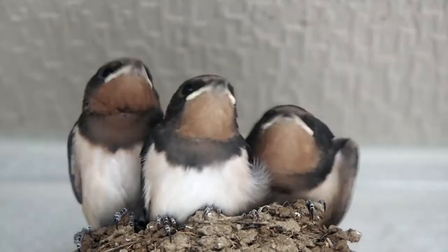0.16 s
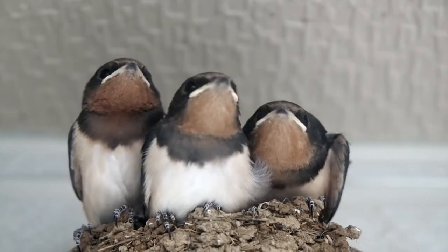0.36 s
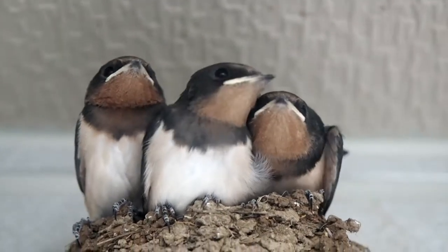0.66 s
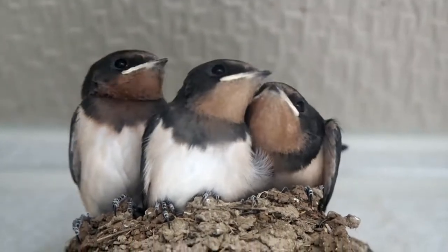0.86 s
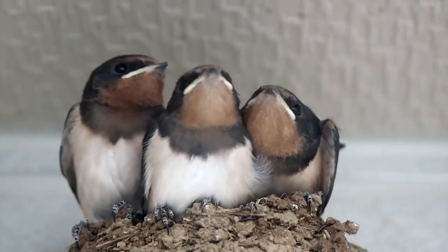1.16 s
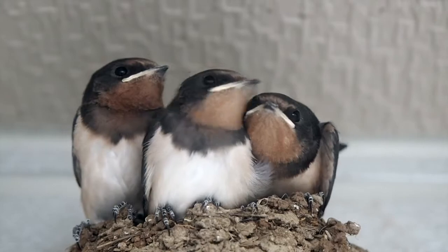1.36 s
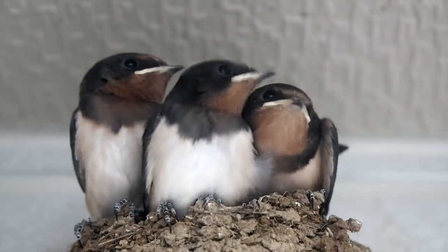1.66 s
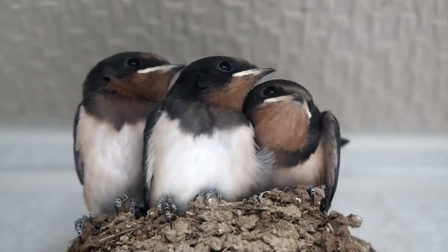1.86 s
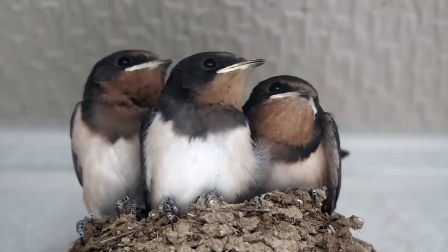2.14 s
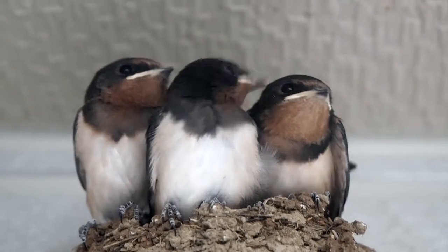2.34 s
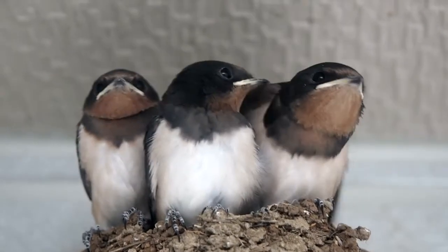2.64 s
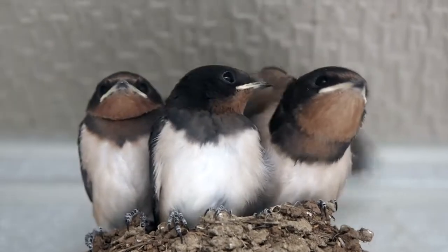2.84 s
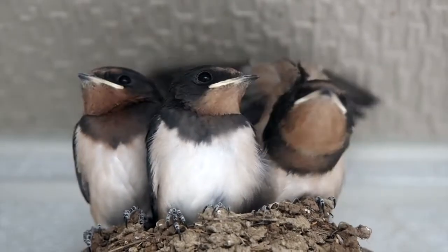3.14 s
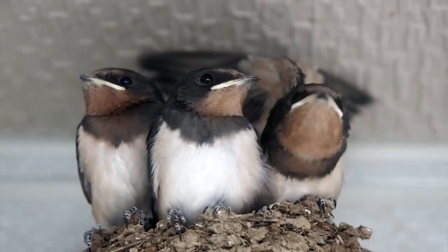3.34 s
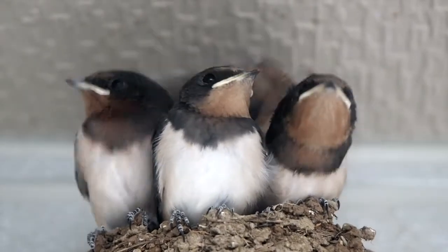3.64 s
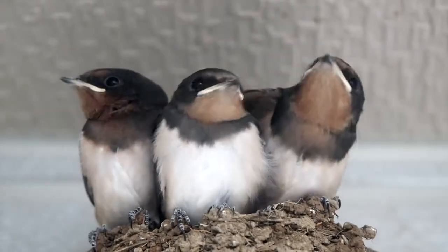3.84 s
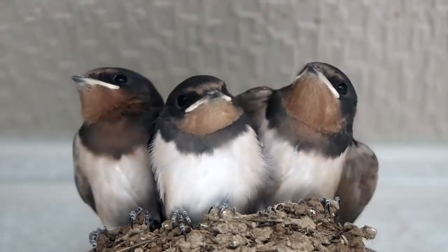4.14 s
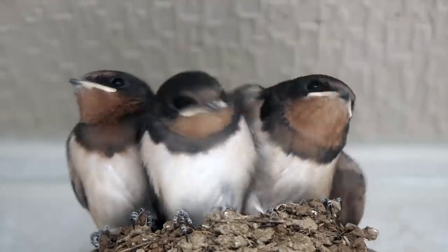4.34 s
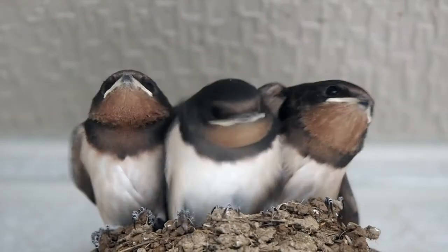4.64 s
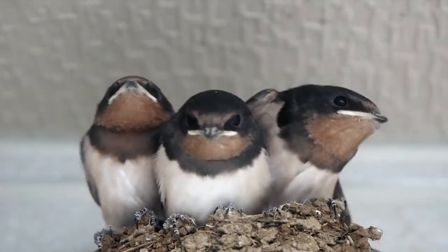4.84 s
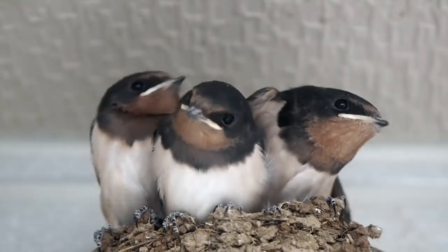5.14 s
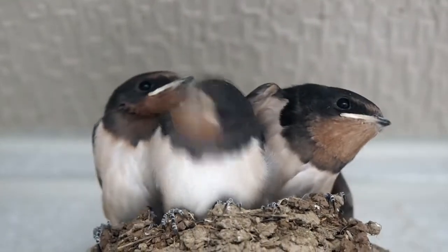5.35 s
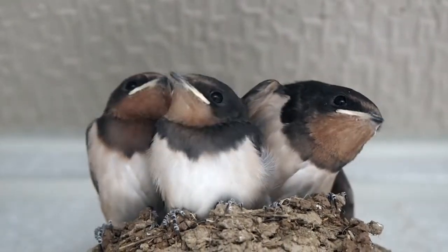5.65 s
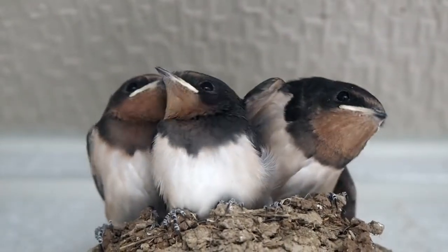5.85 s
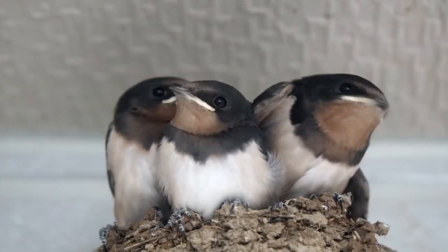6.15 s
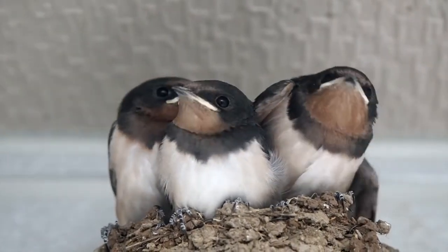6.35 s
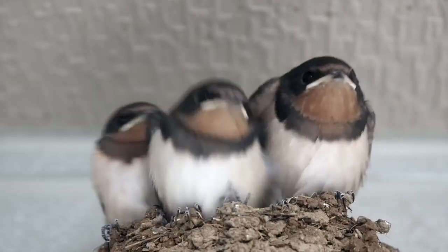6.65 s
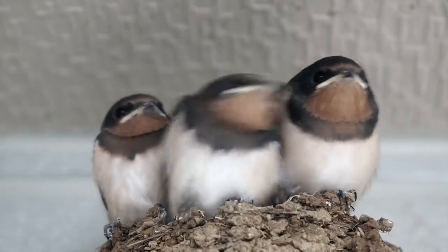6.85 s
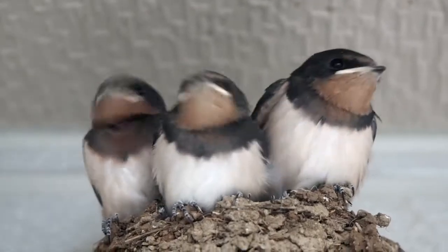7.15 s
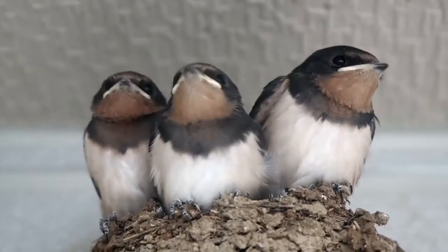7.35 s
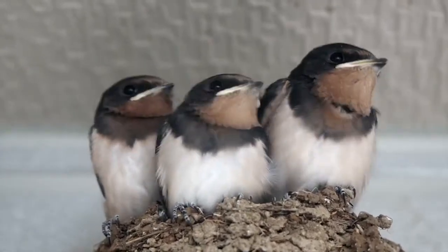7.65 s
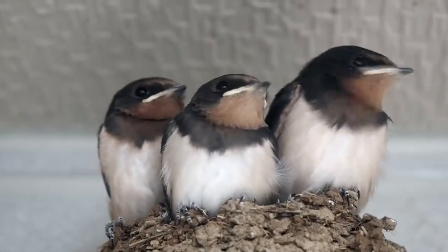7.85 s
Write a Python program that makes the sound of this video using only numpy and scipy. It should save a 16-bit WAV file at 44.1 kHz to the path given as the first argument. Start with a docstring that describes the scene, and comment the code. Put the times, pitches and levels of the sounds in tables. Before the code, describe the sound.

Close, near-centred calls of three swallow chicks under eaves, in stereo with tight echoes and a short tail. Each is about 0.1 s: grainy rasp first, then two simultaneous whistles sweeping up to roughly 3.5 and 5 kHz. Chirps at 0 and 0.15 s, a faint scuff at 0.6, two overlapping at 0.95, a very soft rustle near 1.4, then calls at 1.55, an overlapping pair at 2.07, and 2.9. A close pair comes at 3.35-3.4, then 4.05, 4.4, a strained one at 5.0, 5.5 and 5.95. After a pause with a tiny scuff at 6.9, two follow at 7.15-7.2 and a loud, clearer one at 7.55. Underneath, quiet steady air and distant traffic swell around 5 and 7.2 s; a deep engine drone rises near 4, lingers past 5 and winds down towards 6.8. A machine hums and whines faintly.

```python
"""Three swallow chicks beg from a mud nest under the eaves, each with a call of its own. A call starts as a
rasp of noise and clears into two rising whistles, one from each side of the syrinx. Wall and ceiling close by
echo it, and brief soft hisses come from the nest: two faint rasps and a feather rustle. Behind are steady air
noise, distant traffic as swelling noise, a humming and whining machine as wandering sines, and a deep engine
drone that winds down. A stereo microphone takes it all in."""
import sys
import numpy as np
from scipy import signal
from scipy.fft import rfft, irfft
from scipy.io import wavfile
from scipy.ndimage import uniform_filter1d

SR = 44100
rng = np.random.default_rng(int(sys.argv[2]) if len(sys.argv) > 2 else 0)


def persist_wave(psi):
    """Save psi, clipped to +-1, as 16-bit WAV."""
    counts = np.round(np.clip(psi, -1, 1) * 32767).astype(np.int16)
    wavfile.write(sys.argv[1], SR, np.atleast_2d(counts).T)


N = 352800
TIME = np.arange(N) / SR  # s

# Levels of the birds and scuffs are relative; scene() sets the balance of the nest against the street.
# Calls of each chick: (start [s], length [s], pitch [ratio], level [dB], hoarseness [ratio], strain [dB])
LONG_TIMES = [(-.014, 0.12, 1.03, 0.5, 1.1, -0.5), (1.537, .12, 1, 1.4, 1.05, -3),
              (3.403, .12, 1.04, -4, 1.4, -7.5), (4.369, .129, 1.056, -0.4, 1.02, 0),
              (5.964, .115, .99, 1.5, 1, -.5), (7.559, 0.13, 1, 4, .68, -1)]
HOARSE_TIMES = [(.153, .094, 0.97, 1.6, 0.88, -1), (.939, 0.092, 0.96, 1.5, 0.83, -0.87),
                (2.07, 0.095, 0.98, 1.4, 0.86, 0.073), (2.9, .095, 0.99, -.7, 1.21, 0.51),
                (4.036, .098, .97, -0.79, 1.14, 1.4), (5.52, .097, .98, 0.81, 1, -0.65),
                (7.131, 0.1, 0.97, 0.039, 1.08, 0.85)]
SHARP_TIMES = [(.939, 0.094, 0.96, 0.45, 1.13, -1), (2.072, 0.093, 1.01, 0.65, 1.08, -4),
               (3.356, 0.097, 1.046, 0.61, 0.73, -3.5), (5.022, 0.095, 0.98, 0.054, 1.15, 8),
               (7.204, 0.09, 1.005, 2.6, 0.8, 5)]

# Every call is one gesture: the pitch sags, then climbs to a top note, while the sound swells and clears.
# Places within a call are shares of its length [0-1]; the pitch ratio of each call scales the glides.
# low_glide, high_glide of the two voices: (opening [Hz], lowest [Hz], top [Hz], place of the lowest [share],
#     place of the top [share], power of the climb)
# low_swell, high_swell, rasp_swell: (peak [dB], place of the peak [share, held to .99 at most],
#     power of the attack, fade by the end [dB])
# clearing: (roughness at first [0-1], roughness at last [0-1], place of the change [share], width [share])
LONG_CALL = dict(low_glide=(2480, 2130, 3620, 0.326, .87, 4.6),
             high_glide=(3600, 2930, 4650, .33, .87, 2.4), low_swell=(-20.8, .83, 8, 4),
             high_swell=(-21.5, .79, 1.05, 10), rasp_swell=(-28.2, 1.5, .3, 7),
             clearing=(.7, .08, .6, 0.14))
HOARSE_CALL = dict(low_glide=(2870, 2800, 3490, 0.202, .83, 1.9),
               high_glide=(5000, 4220, 5380, .41, .85, 1.9), low_swell=(-21, 2.3, 1.3, 4),
               high_swell=(-21, 0.8, 0.66, 16), rasp_swell=(-26, .78, 0.58, 12),
               clearing=(.9, 0.24, .45, 0.13))
SHARP_CALL = dict(low_glide=(2700, 2380, 3760, .58, 0.88, 1.9),
              high_glide=(4100, 3450, 5150, 0.57, .88, 1.7), low_swell=(-10, 0.9, 6, 10.5),
              high_swell=(-20, 0.87, 1.4, 14.5), rasp_swell=(-23, 0.7, 0.7, 18),
              clearing=(0.96, 0.1, 0.645, .04))

# Colour of each chick's rasp: (frequency [Hz], level [dB])
LONG_RASP = [(1000, -18), (1800, -18), (2400, 1.5), (3300, -2), (4300, -1), (5000, -14.5), (5750, -4.5),
             (6700, -13.5), (7800, -11.5), (9100, -8), (10800, -12.5), (12600, -18.5), (13400, -44)]
HOARSE_RASP = [(1000, -30.5), (1750, 2.5), (2150, -6), (2850, 3.5), (3600, -1), (4500, 2.5), (5800, -3.5),
               (6700, -36), (7600, -40), (8700, -7.5), (10300, -18), (12500, -13.5), (13600, -33)]
SHARP_RASP = [(1000, -25), (1700, -11), (2350, 0.5), (3600, 2.5), (4700, -5.5), (5500, 6), (7000, -17),
              (8700, -11.5), (10000, -20.5), (12500, -19), (13600, -38)]

# Close echoes off wall and ceiling from each chick's place; a delay of 1 ms is 34 cm of extra path:
# (left delay [ms], left level [dB], right delay [ms], right level [dB])
LONG_ECHOES = [(0.906, -10.5, 0.32, -5.5), (1.051, -10.5, 0.503, -10), (1.435, -9, 0.93, -9)]
HOARSE_ECHOES = [(0.146, -8.5, 0.39, -13.5), (0.279, -11, 0.9, -33), (1.385, -9.5, 1.18, -26)]
SHARP_ECHOES = [(0.116, -5.5, 0.093, -11), (0.592, -9, 0.48, -9), (1.886, -15, 0.95, -19)]

# Brief soft hisses from the nest, two faint rasps and a feather rustle: (time [s], half length [s], relative
# level [dB], tilt [dB per octave])
NEST_HISSES = [(.595, .022, -44, -1), (1.42, .06, -63, 13), (6.917, .018, -43, 0)]
# Colour of these hisses before their tilt: (frequency [Hz], level [dB])
NEST_HISS_COLOUR = [(2200, -8), (3600, 3.5), (4800, -5), (6200, -19), (8800, -6.5), (12000, -21)]

# Colour of tyre noise and of rumble from the distant cars: (frequency [Hz], level [dB])
TRAFFIC_COLOUR = [(100, -12.5), (200, -5), (280, -6), (400, 1.5), (540, -12), (700, 0.5), (1080, -0.5),
                  (1300, -9), (1650, -2.5), (2500, -11), (3500, -15.5), (5000, -25.5), (9000, -26)]
RUMBLE_COLOUR = [(60, -3), (85, 0.5), (125, -3), (190, -12)]
# Swells of the tyre noise and of the rumble: (time [s], half length [s], level [dB])
TYRE_SWELLS = [(0, 0.56, -44), (4.9, 1.34, -43.5), (7.25, 0.91, -40)]
RUMBLE_SWELLS = [(.3, 0.42, -45), (6.5, 0.33, -47.5)]

# Swells of the deep engine drone: (time [s], half length [s], level [dB])
DRONE_SWELLS = [(3.1, .7, -40), (4.1, .32, -33.5), (5.4, 0.94, -35)]

# Steady lines of the machine: (frequency [Hz], level [dB], wander [Hz])
HUM_LINES = [(83.4, -52.5, 3.85), (2100, -61.5, 8)]
# Swells of the machine's whine and of its hum: (time [s], half length [s], level [dB])
WHINE_SWELLS = [(3.15, 0.22, -45.5), (5.75, 0.15, -42), (5.8, 1.9, -51)]
HUM_SWELLS = [(4.56, 1, -51)]

# Colour of the steady air, low and high part: (frequency [Hz], level [dB])
AIR_LOW = [(15, -37), (25, -1), (43, -5), (91, -9.5), (135, -4), (173, -14), (207, -6.5), (237, -15.5),
           (352, -13.5), (409, -10), (482, -23), (639, -13), (919, -17), (1010, -12.5), (1300, -27.5),
           (1690, -72), (2860, -120)]
AIR_HIGH = [(760, -27), (1300, -8), (1830, -0.5), (2010, -7), (2280, -1), (2890, -4.5), (3140, -4),
            (4650, -13.5), (5380, -12), (6900, -16), (8410, -10.5), (11000, -21), (15500, -31.5)]


def chick(shape, colour, calls, echoes, pan_db, **overtones):
    """One bird repeats its call; close echoes, as delayed copies, colour it differently at each ear."""
    out = np.zeros(N)
    for start, *manner in calls:
        call = chirp(shape, colour, *manner, **overtones)
        at = int(start * SR) + np.arange(len(call))
        inside = (at >= 0) & (at < N)
        out[at[inside]] += call[inside]
    khz = np.fft.rfftfreq(N, 1000 / SR)

    def echo(delay_ms, level_db):
        return undb(level_db) * np.exp(-2j * np.pi * khz * delay_ms)

    paths = 1  # the direct sound
    for left_ms, left_db, right_ms, right_db in echoes:
        paths = paths + np.array([echo(left_ms, left_db), echo(right_ms, right_db)])
    pan = undb(np.array([[pan_db], [-pan_db]]) / 2)  # positive is louder at the left
    return irfft(rfft(out) * paths, N) * pan


def chirp(shape, colour, length, pitch, level_db, hoarse, strain_db, coupling_db, sum_db, octave_db,
          low_octave_db, beak_hz):
    """Two voices and a rasp: the voices' beat adds sidebands to the high one, and they share a sum tone.
    Hoarseness roughens the voices and raises the rasp; strain couples the voices and brightens the rasp."""
    edge_s = .002
    t = np.arange(int((length + edge_s) * SR)) / SR
    place = t / length
    rough = clearing(place, *shape["clearing"])
    low_hz = glide(t, length, *shape["low_glide"])
    high_hz = glide(t, length, *shape["high_glide"])
    low, low_gain = membrane(pitch * low_hz, hoarse * rough)
    high, high_gain = membrane(pitch * high_hz, hoarse * rough)
    low_gain = low_gain * envelope(place, *shape["low_swell"])
    high_gain = high_gain * envelope(place, *shape["high_swell"])

    # the beat between the voices puts sidebands above the high one, weaker as the call clears
    coupling_growth = 1.1  # dB of extra coupling for each dB that a call is louder
    second_sideband = 0.28
    coupling = undb(coupling_db + strain_db + coupling_growth * level_db) * np.sqrt(abs(rough))
    beat = high * low.conj()
    sidebands = coupling * (beat + second_sideband * beat ** 2)
    voice = low_gain * low + high_gain * high * (1 + sidebands)

    # the low voice has an octave until it climbs too high
    low_octave_hz = 3200
    low_octave_gain = undb(low_octave_db) / (1 + (low_hz / low_octave_hz) ** 8)
    voice += low_octave_gain * low_gain * low ** 2

    # overtones flash out as they sweep into the resonance of the open beak
    beak_width_hz = 700

    def beak(hz):
        return 1 / (1 + .5 * ((pitch * hz - beak_hz) / beak_width_hz) ** 2)

    sum_gain = undb(sum_db) * np.sqrt(abs(low_gain * high_gain))
    voice += sum_gain * beak(low_hz + high_hz) * low * high
    voice += undb(octave_db) * high_gain * beak(2 * high_hz) * high ** 2

    rasp = hoarse * envelope(place, *shape["rasp_swell"]) * rasp_noise(colour, place, strain_db)
    edges = np.clip(np.minimum(t, t[-1] - t) / edge_s, 0, 1)
    return undb(level_db) * (voice.real + rasp) * edges


def membrane(hz, rough):
    """One side of the syrinx, fluttering in pitch and strength when it is rough: its cycle and its strength."""
    jitter, jitter_hz = 0.078, 450  # share of the pitch at roughness 1, rate
    shimmer, shimmer_hz = 0.45, 380  # share of the strength at roughness 1, rate
    size = len(hz)
    fluttering_hz = hz * (1 + jitter * rough * wander(jitter_hz, size))
    phase = 2 * np.pi * np.cumsum(fluttering_hz) / SR
    strength = np.sqrt(2) * (1 + shimmer * rough * wander(shimmer_hz, size))
    return np.exp(1j * phase), strength


def rasp_noise(colour, place, strain_db):
    """Grainy coloured noise, brighter under strain, whose treble grows as the beak opens."""
    strain_tilt = 0.48  # dB per octave for each dB of strain
    treble_hz, opening_db = 7000, 7
    grain, grain_hz = 0.26, 510  # depth, rate
    tilted = [(hz, db + strain_tilt * strain_db * np.log2(hz)) for hz, db in colour]
    hiss = coloured(tilted, len(place))
    treble = signal.sosfiltfilt(signal.butter(3, treble_hz, "high", fs=SR, output="sos"), hiss)
    treble_gain = undb(opening_db * (place ** 2 - 1))
    hiss = hiss + treble * (treble_gain - 1)
    return hiss * (1 + grain * wander(grain_hz, len(place)))


def glide(t, length, opening_hz, lowest_hz, top_hz, lowest_at, top_at, power):
    """Pitch of a voice: it sags to its lowest, climbs ever faster and holds the top note."""
    rounding_s = 0.0087  # the syrinx rounds the corners of a glide
    place = t / length
    sag = np.clip(1 - place / lowest_at, 0, 1) ** 2
    climb = np.clip((place - lowest_at) / (top_at - lowest_at), 0, 1) ** power
    hz = lowest_hz + (opening_hz - lowest_hz) * sag + (top_hz - lowest_hz) * climb
    return uniform_filter1d(hz, max(int(rounding_s * SR), 1), mode="nearest")


def envelope(place, peak_db, peak_at, power, fade_db):
    """Gain through a call: an abrupt opening, an attack up to the peak, then a fade."""
    onset_step = 0.049  # the call opens this share of its length into the attack
    peak_at = min(peak_at, .99)
    attack = np.clip((place + onset_step) / (peak_at + onset_step), 0, 1) ** abs(power)
    faded = np.clip((place - peak_at) / (1 - peak_at), 0, 1)
    return attack * undb(peak_db - fade_db * faded)


def clearing(place, first, last, middle, width):
    """Roughness through a call: hoarse at first, clear as the pitch climbs."""
    return last + (first - last) * (1 - np.tanh((place - middle) / (2 * width))) / 2


def nest_hisses():
    """Brief soft hisses from the nest: faint rasps of the chicks at 0.6 s and 6.9 s and a feather rustle at 1.4
    s, as bells of tilted noise."""
    lift_db = 6  # added to the levels in the table
    out = np.zeros(N)
    for time_s, half_s, level_db, tilt_db in NEST_HISSES:
        tilted = [(hz, db + tilt_db * np.log2(hz)) for hz, db in NEST_HISS_COLOUR]
        out += undb(level_db + lift_db) * bell(time_s, half_s) * coloured(tilted, N)
    return out


def eaves(x):
    """Direct sound and a short diffuse tail of decaying noise, different at each ear; its treble dies sooner."""
    split_hz, build_s = 5000, 0.0015
    dull_t60_s, dull_db = 0.29, -14.5206
    bright_t60_s, bright_db = 0.16, -7.5
    t = np.arange(SR // 2) / SR

    def tail(noise, t60_s, level_db):
        fade = np.exp(-np.log(1000) * t / t60_s) * np.minimum(t / build_s, 1)
        return undb(level_db) * noise * fade / np.linalg.norm(fade)

    out = []
    for ear in range(2):
        dull = shaped(lambda f: 1 / np.hypot(1, (f / split_hz) ** 2), len(t))
        bright = shaped(lambda f: 1 / np.hypot(1, (split_hz / f) ** 2), len(t))
        response = tail(dull, dull_t60_s, dull_db) + tail(bright, bright_t60_s, bright_db)
        out.append(x[ear] + signal.fftconvolve(x[ear], response)[:N])
    return np.array(out)


def traffic():
    """Distant cars swell and fade over a steady level: flickering tyre noise and a low rumble."""
    flicker_db, flicker_hz = 1.5, 5.8
    flicker = undb(flicker_db * wander(flicker_hz, N))
    tyres = swells(TYRE_SWELLS, steady_db=-51.5) * flicker * wide(TRAFFIC_COLOUR, side_db=-9.5)
    rumble = swells(RUMBLE_SWELLS, steady_db=-51) * coloured(RUMBLE_COLOUR, N)
    return tyres + rumble


def drone():
    """A deep engine note that swells and wavers; it holds its speed, then winds down ever faster to idle."""
    running_hz, idle_hz, wander_hz = 50.4, 30.7, 0.99
    wind_down_start_s, wind_down_s, wind_down_power = 4.3, 2.55, 2.8
    waver_db = 0.8
    slowing = np.clip((TIME - wind_down_start_s) / wind_down_s, 0, 1) ** wind_down_power
    hz = running_hz + (idle_hz - running_hz) * slowing + wander_hz * wander(3.2, N)
    return swells(DRONE_SWELLS, steady_db=-52.5) * tone(hz, waver_db * wander(2.7, N))


def machine():
    """A machine hums and whines: sines that wander in pitch and waver in level, two of them with swells."""
    waver_db = 4.0

    def line(hz, level_db, wander_hz):
        return tone(hz + wander_hz * wander(7.55, N), level_db + waver_db * wander(3.4, N))

    hum = swells(HUM_SWELLS, steady_db=-59.5) * line(210, 0, wander_hz=3)
    for hz, level_db, wander_hz in HUM_LINES:
        hum += line(hz, level_db, wander_hz)
    whine_hz = 1048 + 9 * wander(24.7, N)
    whine = swells(WHINE_SWELLS, steady_db=-56.5) * tone(whine_hz, waver_db * wander(20.5, N))
    return hum + whine


def air():
    """Steady air around the microphone: a low and a high band of stereo noise."""
    return undb(-46) * wide(AIR_LOW, side_db=-8) + undb(-52) * wide(AIR_HIGH, side_db=-2)


def undb(db):
    """Decibels to gain."""
    return 10 ** (np.asarray(db) / 20)


def shaped(gain, size):
    """Noise of rms 1 whose spectrum follows gain(Hz)."""
    hz = np.maximum(np.fft.rfftfreq(size, 1 / SR), 1)
    x = irfft(rfft(rng.standard_normal(size)) * gain(hz), size)
    return x / np.std(x)


def coloured(points, size):
    """Noise of rms 1 with a spectrum of (Hz, dB) points, falling away beyond its ends."""
    hz, db = np.transpose(points)

    def gain(f):
        ends = np.minimum(1, np.minimum(f / hz[0], hz[-1] / f)) ** 6
        return undb(np.interp(np.log(f), np.log(hz), db)) * ends

    return shaped(gain, size)


def wander(rate_hz, size):
    """Smooth random motion of spread 1."""
    return shaped(lambda f: np.exp(-.5 * (f / rate_hz) ** 2), size)


def wide(points, side_db):
    """Stereo noise: alike in both ears in the bass, less so above."""
    side = signal.sosfilt(signal.butter(1, 600, "high", fs=SR, output="sos"), coloured(points, N))
    return coloured(points, N) + undb(side_db) * side * np.array([[1], [-1]])


def tone(hz, db):
    """A sine that follows a pitch and an rms level."""
    return np.sqrt(2) * undb(db) * np.sin(2 * np.pi * np.cumsum(hz) / SR)


def bell(time_s, half_s):
    """A bell-shaped rise and fall, 1 at its peak; half_s is its standard deviation."""
    return np.exp(-.5 * ((TIME - time_s) / half_s) ** 2)


def swells(rows, steady_db):
    """Gain of a steady sound with bell-shaped swells on top, added as powers."""
    bells = [undb(db) * bell(time_s, half_s) for time_s, half_s, db in rows]
    return np.sqrt(undb(steady_db) ** 2 + np.sum(np.square(bells), axis=0))


def scene():
    """The three chicks close by under the eaves, over the distant street."""
    birds = chick(LONG_CALL, LONG_RASP, LONG_TIMES, LONG_ECHOES, pan_db=0.2, coupling_db=-7.5,
                  sum_db=-8.5, octave_db=-18, low_octave_db=-33, beak_hz=9130)
    birds += chick(HOARSE_CALL, HOARSE_RASP, HOARSE_TIMES, HOARSE_ECHOES, pan_db=0.0, coupling_db=-22.5,
                   sum_db=-15.0, octave_db=-22.5, low_octave_db=-31, beak_hz=9460)
    birds += chick(SHARP_CALL, SHARP_RASP, SHARP_TIMES, SHARP_ECHOES, pan_db=-0.5, coupling_db=-12.5,
                   sum_db=-18.0, octave_db=-28, low_octave_db=-19, beak_hz=8400)
    nest = undb(-2.5) * eaves(birds + nest_hisses())
    street = traffic() + drone() + machine() + air()
    return nest + street


def record(dry):
    """The stereo microphone widens the treble; the recorder cuts the top."""
    widen, widen_hz, top_hz = 0.59, 1500, 15700
    difference = (dry[0] - dry[1]) / 2
    side = signal.sosfilt(signal.butter(1, widen_hz, "high", fs=SR, output="sos"), difference)
    widened = dry + widen * side * np.array([[1], [-1]])
    return signal.sosfilt(signal.ellip(8, .2, 70, top_hz, fs=SR, output="sos"), widened)


dry = scene()
out = record(dry)
persist_wave(out)
```